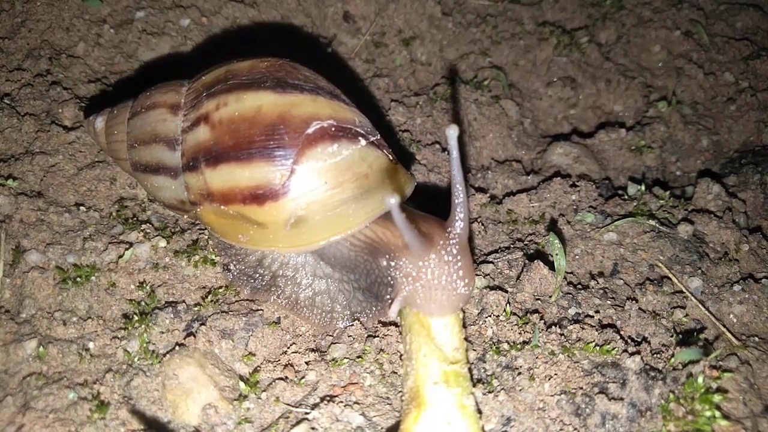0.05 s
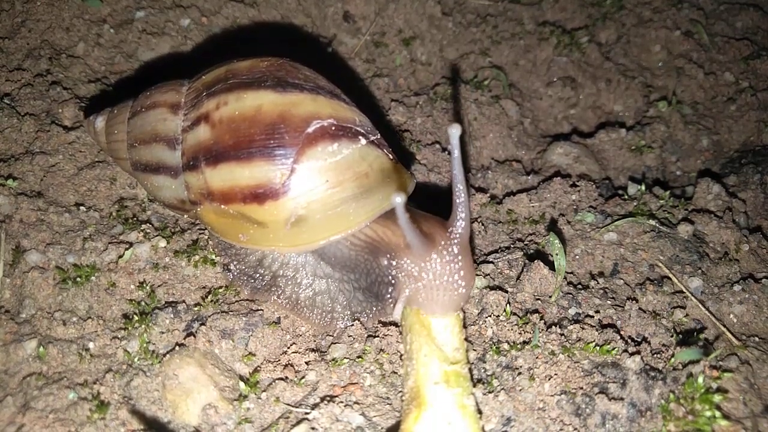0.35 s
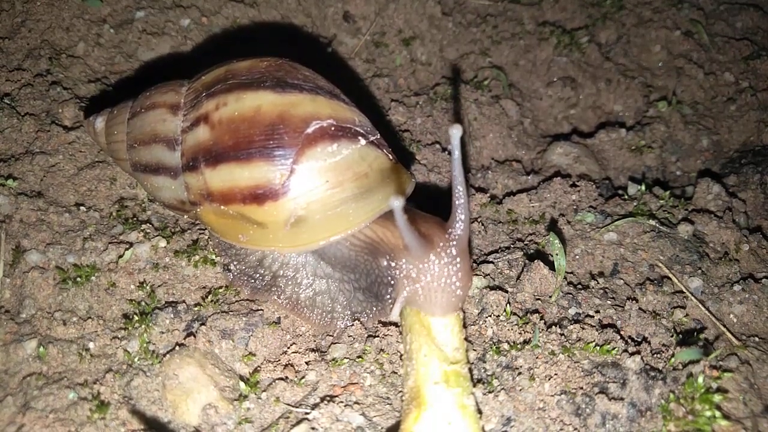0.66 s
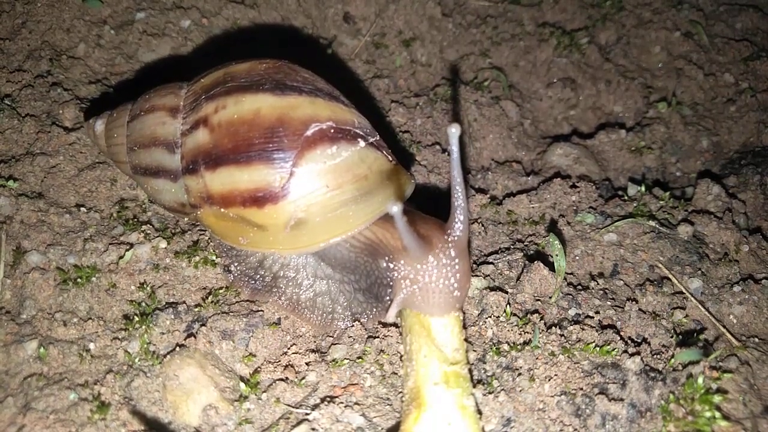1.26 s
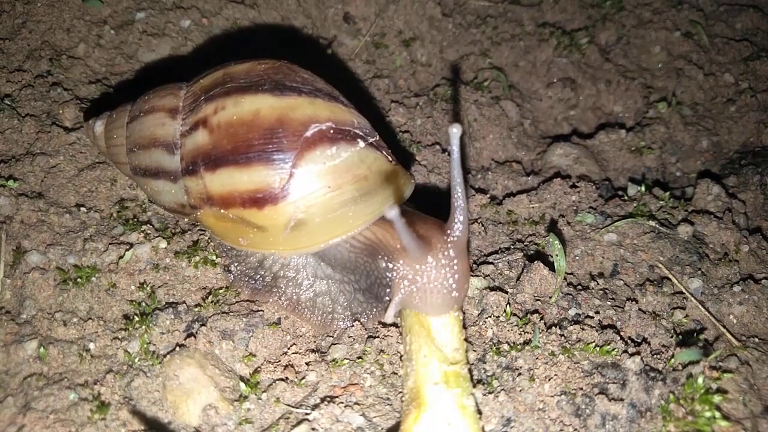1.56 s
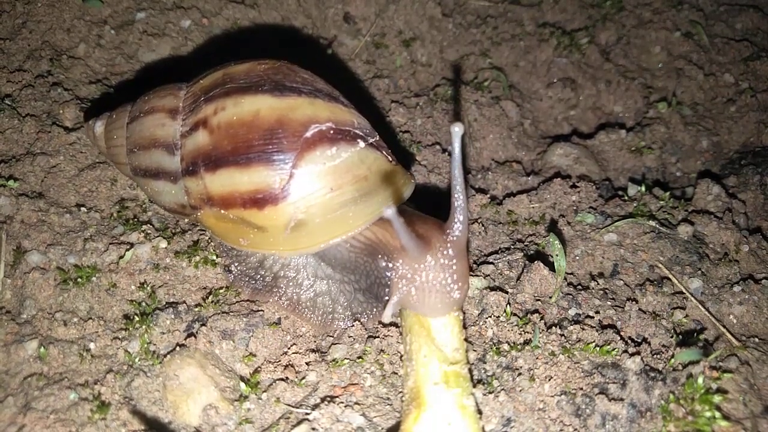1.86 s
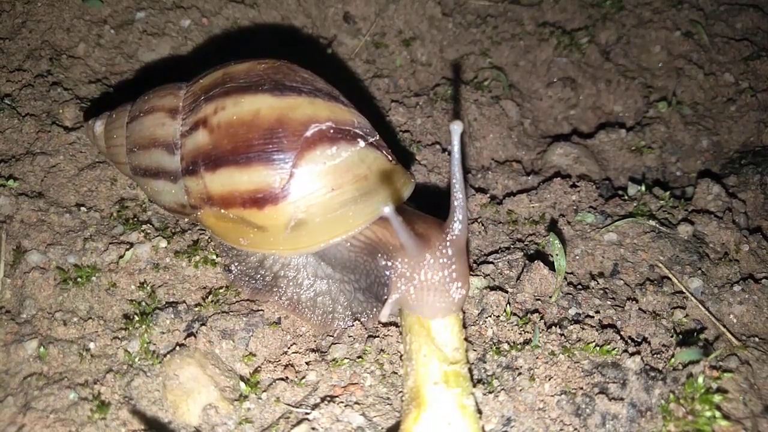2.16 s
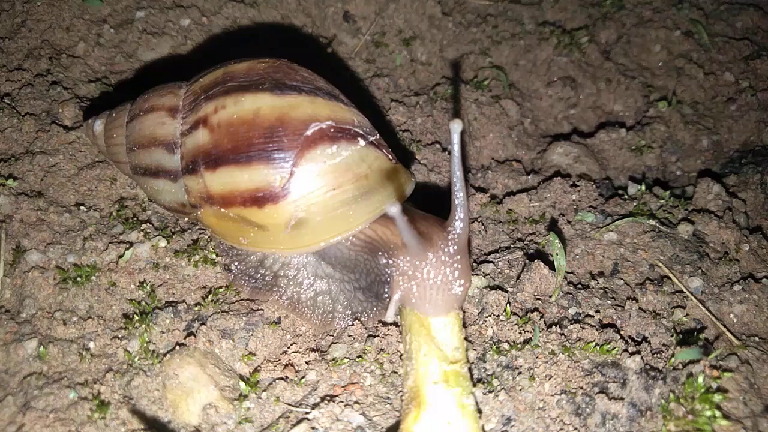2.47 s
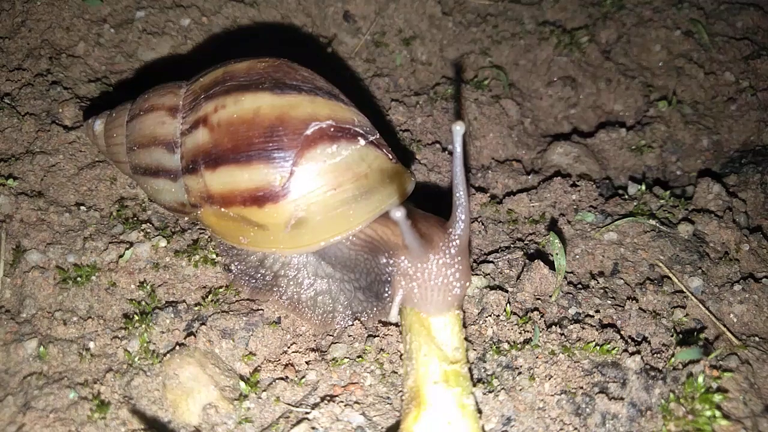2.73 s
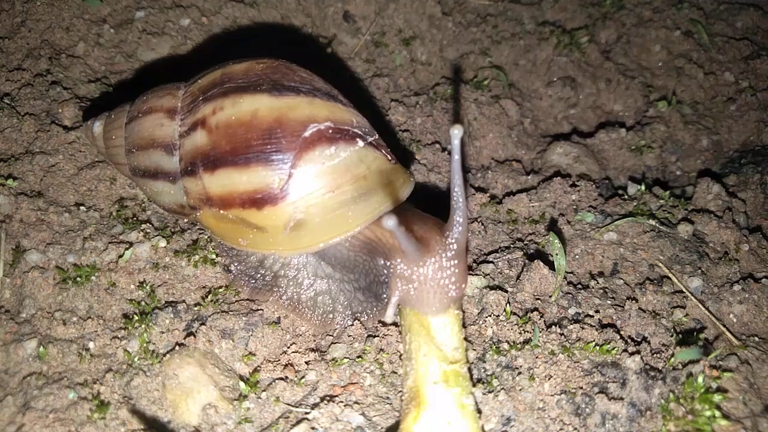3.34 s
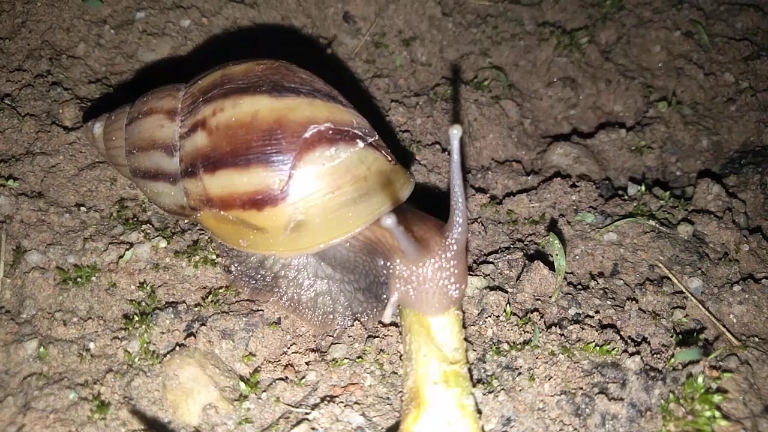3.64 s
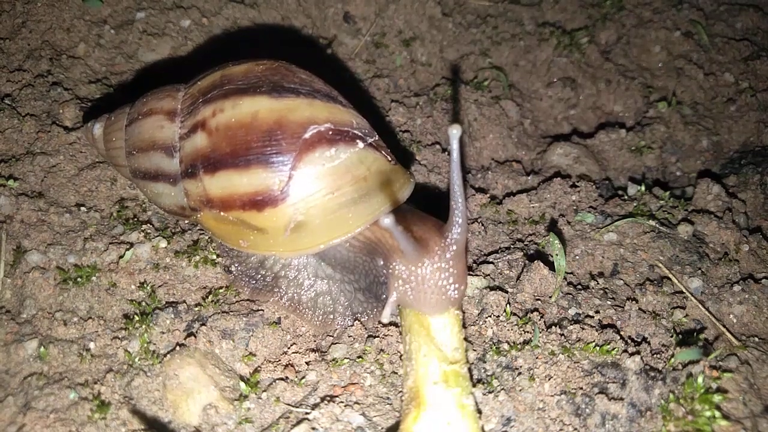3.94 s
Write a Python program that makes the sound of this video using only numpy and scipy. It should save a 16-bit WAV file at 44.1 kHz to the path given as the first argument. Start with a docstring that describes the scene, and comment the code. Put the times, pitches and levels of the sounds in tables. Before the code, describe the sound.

A near cricket gives shrill, rhythmic chirps in the open night air, and a more distant one soon joins in. Behind them are thin insect chirps, ticks and rasps, soft far croaks and a faint low hum.

```python
"""Night outdoors. From the start: faint hum, far frog-like croaks, thin high chirps, a low trill, ticks, rasps,
and a near cricket whose wing pulses buzz at about 5.5 kHz. It pauses after three buzzes.
At 1 s a second cricket, further off, answers with falling strokes; at 1.2 s comes a far yelp.
Both crickets call until the near one pauses at 2.6 s. At 3.2 s a far whistle starts, then the near
cricket closes with three buzzes. Ground and trees scatter the calls back throughout."""
import sys
import numpy as np
from scipy import signal
from scipy.fft import rfft, irfft
from scipy.io import wavfile
from scipy.ndimage import uniform_filter1d

SR = 44100
rng = np.random.default_rng(int(sys.argv[2]) if len(sys.argv) > 2 else 0)


def put_to_file(sound):
    """Save the sound as 16-bit audio at rate SR, in the file named by the first command-line argument."""
    columns = np.atleast_2d(sound).T  # one column per channel
    safe = np.clip(columns, -1, 1)
    whole_steps = np.round(safe * 32767)
    wavfile.write(sys.argv[1], SR, whole_steps.astype(np.int16))


N = 176400


def amp(db):
    """Decibels to gain."""
    return 10 ** (np.asarray(db) / 20)


def unit(x):
    """Scale to rms 1."""
    return x / np.sqrt(np.mean(abs(x) ** 2) + 1e-20)


def add(mix, start_s, sound):
    """Mix a sound in; negative starts move to 0."""
    part = mix[max(round(start_s * SR), 0):][:len(sound)]
    part += sound[:len(part)]


def colour(x, curve):
    """Filter by a (Hz, dB) curve, interpolated over log frequency."""
    hz, db = np.transpose(curve)
    gain_db = np.interp(np.log(np.fft.rfftfreq(N, 1 / SR) + 1), np.log(hz), db)
    return irfft(rfft(x) * amp(gain_db), N)


def band(hz, width_hz):
    """Narrow noise around hz, rms 1."""
    offset = (np.fft.rfftfreq(N, 1 / SR) - hz) / width_hz
    return unit(irfft(rfft(rng.standard_normal(N)) / (1 + offset ** 2) ** 2, N))


def tone(hz):
    """Sine along a pitch curve, random phase."""
    return np.sin(2 * np.pi * (np.cumsum(hz) / SR + rng.random()))


def stroke(length_s, hz, sag_hz, rough):
    """Arched note. In a wing stroke, pitch sags as the scraper slows and uneven teeth roughen it."""
    progress = np.linspace(0, 1, int(length_s * SR))
    jitter = unit(uniform_filter1d(rng.standard_normal(len(progress)), size=40))
    arch = np.sin(np.pi * progress).clip(0) ** .65
    return arch * tone(hz * (1 + rough * jitter) - sag_hz * progress ** 3)


def scatter(x, wet_db, t60_s, gap_s=0.0018):
    """Add ground and foliage echoes; three crossfaded sets of paths give a slow drift."""
    t, out = np.arange(SR) / SR, x.copy()
    decay = amp(-60 * t / t60_s) * (t > gap_s)
    for k in range(3):
        taps = rng.standard_normal(SR) * (rng.random(SR) < .08) * decay
        share = np.cos(np.pi * (np.arange(N) / SR + k / 3)) * np.sqrt(2 / 3)
        out += amp(wet_db) * signal.fftconvolve(x * share, taps / np.linalg.norm(taps))[:N]
    return out


def background():
    """Night air, low hum and rumble, blurred chorus of far insects."""
    # Each row: frequency in Hz, relative noise density in dB.
    air_spectrum = [(20, 0), (60, 8.5), (170, 1), (250, -15.5), (400, -25.5), (600, -22.5), (1200, -25),
                    (1900, -29), (3300, -32.5), (5500, -23.5), (6500, -12), (7600, -20.5), (9000, -25.5),
                    (10300, -23.5), (13000, -32.5), (14500, -25), (16000, -47)]
    # Each row: frequency in Hz, level in dB.
    hum_lines = [(53, -58), (102, -70.5), (153, -68)]
    # Each row of both: centre in Hz, level in dB, width in Hz.
    rumble_bands = [(52.7, -58, 9.5), (78.7, -62.5, 47), (151, -70.5, 31)]
    chorus_bands = [(2296, -75.5, 183), (3094, -74, 300), (4850, -72.5, 170)]
    air = amp(-60.5) * unit(colour(rng.standard_normal(N), air_spectrum))
    hum = sum(amp(db) * unit(tone(hz + 0.54 * band(0, 2.24))) for hz, db in hum_lines)
    return air + hum + sum(amp(db) * band(hz, width_hz) for hz, db, width_hz in rumble_bands + chorus_bands)


def rustles():
    """Brief swells of dull noise."""
    # Each row: start in seconds, length in seconds, level at the crest in dB.
    rustle_swells = [(0.01, 0.28, -63.5), (1.247, 0.11, -58), (2.874, 0.072, -64), (3.865, 0.19, -55.5)]
    # Each row: frequency in Hz, gain in dB.
    rustle_spectrum = [(60, -16), (110, 11.5), (220, 15.5), (300, -58), (550, -14), (900, -12), (1500, -20),
                       (4000, -40)]
    level = np.zeros(N)
    for start_s, length_s, db in rustle_swells:
        add(level, start_s, amp(db) * np.hanning(int(length_s * SR)))
    return level * unit(colour(rng.standard_normal(N), rustle_spectrum))


def peeps():
    """Faint notes of far animals."""
    # Each row: start in seconds, pitch in Hz, level in dB.
    peep_notes = [(.97, 1426, -76), (1.09, 897, -76), (1.30, 1400, -76), (2.25, 2145, -66.5),
                  (2.88, 2257, -68), (3.42, 1381, -70.5), (3.79, 1372, -76.5)]
    out = np.zeros(N)
    for start_s, hz, db in peep_notes:
        add(out, start_s, amp(db) * stroke(0.036, hz, sag_hz=27, rough=0.03))
    return scatter(out, wet_db=7.5, t60_s=0.31)


def far_call(contour, partials, rough, wet_db):
    """Wavering call of a distant animal, with echoes."""
    times_s, hz, db = np.transpose(contour)
    t = np.arange(N) / SR
    pitch_hz = np.interp(t, times_s, hz) * (1 + rough * band(0, 114))
    gate = (t > times_s[0]) * (t < times_s[-1])
    level = uniform_filter1d(amp(np.interp(t, times_s, db)) * gate, size=400)
    voice = sum(amp(gain_db) * level * tone(multiple * pitch_hz) for multiple, gain_db in partials)
    return scatter(voice, wet_db, t60_s=0.39)


def far_whistle():
    """One partial, climbing to about 2 kHz."""
    # Each row: time in seconds, nominal pitch in Hz, level in dB.
    whistle_contour = [(3.21, 1570, -72), (3.28, 1698, -57), (3.35, 1698, -60.5), (3.41, 2070, -65),
                       (3.49, 1966, -57), (3.56, 1940, -67.5), (3.66, 1946, -73)]
    return far_call(whistle_contour, partials=[(0.99, 0.036)], rough=0.028, wet_db=1.0)


def far_yelp():
    """Short rising call of three harmonics."""
    # Each row: time in seconds, pitch in Hz, level in dB.
    yelp_contour = [(1.225, 691, -68), (1.25, 703, -56), (1.285, 720, -71.5), (1.32, 765, -66)]
    # Each row: harmonic number, gain in dB.
    yelp_partials = [(1, 7.5), (2, -21), (3, 2)]
    return far_call(yelp_contour, yelp_partials, rough=0.0466, wet_db=-1.5)


def croaks():
    """Soft hoarse hoots, probably far frogs, over a murmur of more distant ones."""
    # Each row: start in seconds, length in seconds, relative level in dB.
    croak_notes = [(0.191, 0.055, -57.5), (0.514, 0.049, -57), (0.594, 0.033, -56), (0.782, 0.075, -54),
                   (1.199, 0.11, -53.5), (1.41, 0.075, -48), (1.516, 0.16, -56.5), (1.704, 0.044, -60),
                   (1.792, 0.05, -54.5), (2.02, 0.043, -49.5), (2.401, 0.088, -52), (2.637, 0.036, -56),
                   (2.82, 0.08, -55.5), (3.014, 0.036, -57), (3.239, 0.03, -56), (3.831, 0.041, -52.5),
                   (3.93, 0.065, -52)]
    out = np.zeros(N)
    for start_s, length_s, db in croak_notes:
        hz = 378 + 6 * rng.standard_normal()
        add(out, start_s, amp(db - 1.5) * stroke(length_s, hz, sag_hz=21.6, rough=0))
    hoarse = out * (1 + .5 * band(0, 94))
    hoots = scatter(hoarse, wet_db=-5.5, t60_s=0.98)
    murmur = amp(-75 + 6.0 * band(0, 22)) * band(349, 94)
    return hoots + murmur


def far_crickets():
    """Stray strokes of other crickets over three distant, irregular callers."""
    # Each row: start in seconds, pitch in Hz, level in dB.
    stray_strokes = [(.0, 4860, -44.5), (.03, 4880, -49), (.085, 4840, -49), (0.196, 3300, -57.5),
                     (.25, 4870, -50), (.4, 4760, -57), (0.448, 4710, -53), (0.541, 4710, -56),
                     (.665, 3200, -58.5), (.682, 4830, -47.5), (.768, 5330, -62.5), (.795, 5320, -56),
                     (.833, 4850, -58), (.87, 4830, -53), (.945, 4390, -59), (0.978, 4640, -45),
                     (.99, 4510, -46), (3.715, 4880, -52), (3.775, 4850, -50), (3.891, 4990, -43)]
    # Each row: pitch in Hz, top level in dB, strokes per second.
    far_callers = [(4860, -63.5, 28), (4640, -75, 8.8), (5360, -61, 5.9)]
    out = np.zeros(N)
    for start_s, hz, db in stray_strokes:
        add(out, start_s, amp(db) * stroke(0.017, hz, sag_hz=120, rough=0.009))
    for hz, db, rate_hz in far_callers:
        for slot, (lag, weakness) in enumerate(rng.random((int(rate_hz * N / SR), 2))):
            note = stroke(0.021, hz, sag_hz=73, rough=0.0027)
            add(out, (slot + lag) / rate_hz, amp(db - 14.0 * weakness) * note)
    return scatter(out, wet_db=-2.0, t60_s=0.38)


def scraping_runs(click_hz=42):
    """Dry runs of scraping clicks that bite at the start and fade."""
    # Each row: start in seconds, length in seconds, relative level in dB.
    rasp_runs = [(0.005, 0.027, -6), (0.11, 0.064, -8.5), (0.207, 0.037, -12), (1.147, 0.26, -1.5),
                 (1.407, 0.044, -3), (1.629, 0.13, -1.5), (1.782, 0.17, 3), (2.106, 0.16, 0),
                 (2.25, 0.2, 2), (2.672, 0.28, 1), (3.204, 0.05, -6.5)]
    # Each row: frequency in Hz, gain in dB.
    rasp_spectrum = [(2900, -62), (3300, -5.5), (3550, 2.5), (4250, -0.5), (4700, 13.5), (5250, -6.5),
                     (5750, 7), (6100, -21), (7500, -65)]
    out = np.zeros(N)
    for start_s, length_s, db in rasp_runs:
        t = np.arange(0, length_s, 1 / SR)
        bite_db, fade_db = 1.75 * np.exp(-t / 0.031), 9.9 * (t / length_s) ** 4
        clicks = np.exp(-(t * click_hz % 1) / .5) * rng.standard_normal(len(t))
        add(out, start_s, amp(db - 40 + bite_db - fade_db) * clicks)
    return scatter(colour(out, rasp_spectrum), wet_db=-1, t60_s=.3)


def ticking_insect(rise_s=0.0011):
    """Sharp ticks that ring briefly near 4 kHz."""
    # Each row: time in seconds, relative level in dB, pitch in Hz.
    tick_events = [(0.0313, -43, 4150), (0.1003, -42, 4110), (0.23, -39, 4250), (0.3293, -50, 4330),
                   (0.3795, -47, 4300), (0.4616, -44, 4250), (0.615, -52, 4040), (1.146, -36, 4160),
                   (1.409, -43.5, 4360), (1.594, -44, 4314), (3.204, -37, 4580), (3.2537, -45, 4370),
                   (3.312, -37.5, 4340), (3.366, -33, 4450), (3.4708, -40, 4420), (3.5217, -41.5, 4130),
                   (3.5728, -39.5, 4040), (3.6402, -43.5, 4120), (3.8243, -43.5, 4140), (3.8827, -39, 4087),
                   (3.9395, -39, 4070), (3.979, -43, 3940), (3.9894, -36, 4140)]
    out, t = np.zeros(N), np.arange(SR // 40) / SR
    shape = (t / rise_s) ** 2 * np.exp(2 * (1 - t / rise_s))
    for time_s, db, hz in tick_events:
        add(out, time_s - .001, amp(db + 2) * shape * np.sin(2 * np.pi * hz * t))
    return scatter(out, wet_db=1.5, t60_s=0.32)


def low_trill(rate_hz=37, fall_hz_per_s=800):
    """Far bursts of grainy strokes near 3 kHz, blurred by echoes."""
    # Each row: start in seconds, length in seconds, relative level in dB.
    trill_bursts = [(0.017, .09, -1.5), (0.358, .15, 0), (0.709, .15, 0), (1.007, .17, 1.5),
                    (1.451, .15, -3.5), (1.853, .22, -5), (2.291, .06, 3.5), (2.543, .17, 1),
                    (2.888, .16, -1), (3.326, .16, -0.5), (3.745, .18, 0)]
    # Each row: frequency in Hz, gain in dB.
    trill_spectrum = [(2600, -16), (2740, -5), (2840, 6.5), (3100, -7), (3400, -2.5)]
    out = np.zeros(N)
    for start_s, length_s, db in trill_bursts:
        for offset_s in np.arange(0, length_s, 1 / rate_hz):
            gain = amp(db - 59 + 2 * rng.standard_normal())
            hz = 3040 - fall_hz_per_s * offset_s + 45 * rng.standard_normal()
            add(out, start_s + offset_s - .01, gain * stroke(0.0188, hz, sag_hz=160, rough=0.028))
    grainy = out * (1 + 0.54 * band(0, 180))
    return scatter(colour(grainy, trill_spectrum), wet_db=4, t60_s=0.19)


def thin_cricket(rate_hz=68, first_hz=8580, settled_hz=8390, rise_db=10):
    """High six-stroke chirps that settle lower in pitch and swell to the fifth stroke."""
    # Each row: start in seconds, relative level in dB.
    thin_chirps = [(0.012, -4.5), (0.276, -3.5), (0.533, -1), (0.763, -3), (1.016, -1.5), (1.293, -1),
                   (1.531, -5.5), (1.763, -1), (1.998, -1.5), (2.226, -4), (2.464, -1.5), (2.696, -7.5),
                   (2.929, -2), (3.166, -7), (3.391, -2.5), (3.605, -5), (3.806, -4.5)]
    out = np.zeros(N)
    for start_s, db in thin_chirps:
        for k in range(6):
            hz = settled_hz + (first_hz - settled_hz) * np.exp(-k / 0.81) + 45 * rng.standard_normal()
            gain = amp(db - 51 - rise_db * abs(k / 4 - 1) + 1.2 * rng.standard_normal())
            add(out, start_s - .005 + k / rate_hz, gain * stroke(0.015, hz, sag_hz=81, rough=0.0071))
    return scatter(out, wet_db=0.5, t60_s=0.15)


def second_cricket(rate_hz=29.5, stroke_s=0.0195, snap_s=0.0054):
    """Falling wing strokes, each ending in a snap, doubled by the ground, smeared by undergrowth."""
    # Each row: start in seconds, stroke count, relative level in dB.
    answer_chirps = [(1.005, 2, 2), (1.192, 3, 2.5), (1.4067, 3, 1.5), (1.624, 3, 1.5), (1.841, 3, 1),
                     (2.093, 3, 2), (2.3103, 3, 2), (2.5651, 3, 1), (2.819, 3, 1.5), (3.074, 3, 1.5),
                     (3.331, 3, 1)]
    # Each row: delay in seconds, gain in dB.
    ground_echoes = [(.0043, -11), (0.0085, -14), (0.0135, -2)]
    # Each row: frequency in Hz, gain in dB.
    wing_passband = [(3800, -12), (4400, -0.5), (5500, -1), (6000, -8)]
    direct = np.zeros(N)
    for start_s, count, db in answer_chirps:
        for k in range(round(count)):
            onset_s = start_s + k / rate_hz
            gain = amp(db - 34 - 2.5 * (k == 0))
            hz = 5240 + 25 * rng.standard_normal()
            add(direct, onset_s, gain * stroke(stroke_s, hz, sag_hz=650, rough=0.013))
            snap = amp(-2) * stroke(snap_s, hz=4670, sag_hz=460, rough=0)
            add(direct, onset_s + stroke_s - snap_s, gain * snap)
    doubled = direct.copy()
    for delay_s, db in ground_echoes:
        add(doubled, delay_s, amp(db) * direct)
    effort = uniform_filter1d(abs(doubled), size=100)
    scrape = amp(-4) * effort * band(4880, 308)
    sizzle = amp(-42) * effort * band(14903, 1700)
    return scatter(colour(doubled + scrape, wing_passband) + sizzle, wet_db=-4.0, t60_s=0.47)


def near_cricket(rate_hz=122, pitch_hz=5573, soft_drop_hz=270, glide_hz=-120):
    """Crescendos of very short wing pulses that rise in pitch and stop abruptly."""
    # Each row: end in seconds, length in seconds, relative level in dB.
    near_buzzes = [(0.112, 0.079, -1), (0.378, 0.074, -1.5), (0.633, 0.077, -2), (1.34, 0.066, -1),
                   (1.585, 0.075, -1), (1.8292, 0.098, -1.5), (2.089, 0.085, -2), (2.350, 0.091, -2),
                   (2.609, 0.0725, -0.5), (3.347, 0.068, -2.5), (3.583, 0.08, -2), (3.837, 0.077, -1)]
    # Each row: frequency in Hz, gain in dB.
    buzz_spectrum = [(4600, -38), (5020, -16), (5200, 1), (5800, 1), (6000, -16), (6400, -19)]
    rise_s, fall_s, swell_s, last_accent_db = 0.0012, 0.00026, 0.038, 1.5
    lead_s = 0.015  # faint pulses ahead of each buzz
    out, t = np.zeros(N), np.arange(-.004, .004, 1 / SR)
    shape = np.exp(-(t / np.where(t < 0, rise_s, fall_s)) ** 2)
    bend_hz = glide_hz * np.tanh(t / rise_s)
    for end_s, length_s, db in near_buzzes:
        for left_s in np.arange(0, length_s + lead_s, 1 / rate_hz):
            swell = min(1, .04 + (length_s + lead_s - left_s) / (swell_s + lead_s)) ** 1.95
            hz = pitch_hz - soft_drop_hz * (1 - swell) + bend_hz + 25 * rng.standard_normal()
            onset_s = end_s - left_s + t[0] + rng.normal(0, .00015)
            gain = amp(db - 25 + last_accent_db * (left_s == 0) + 0.64 * rng.standard_normal())
            add(out, onset_s, swell * gain * shape * tone(hz))
    early = scatter(colour(out, buzz_spectrum), wet_db=-5.5, t60_s=0.025)
    return scatter(early, wet_db=-8.0, t60_s=0.32)


def scene():
    """All callers over the background, mono."""
    crickets = near_cricket() + second_cricket() + thin_cricket()
    other_insects = low_trill() + ticking_insect() + scraping_runs() + far_crickets()
    far_animals = croaks() + peeps() + far_whistle() + far_yelp()
    return (crickets + other_insects + far_animals + rustles() + background())[None]


def record(dry):
    """Steep low-pass."""
    cutoff_hz = 15750
    taps = signal.firwin(511, cutoff_hz, window=("kaiser", 9), fs=SR)
    return signal.oaconvolve(dry, taps[None], "same")


dry = scene()
out = record(dry)
put_to_file(out)
```